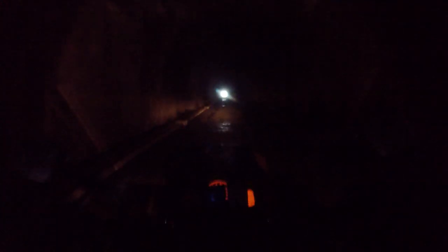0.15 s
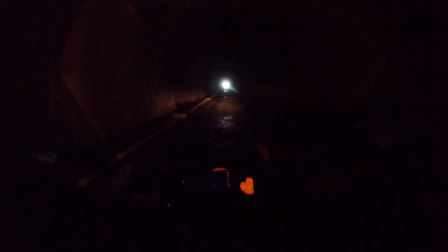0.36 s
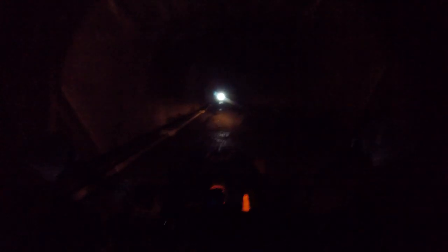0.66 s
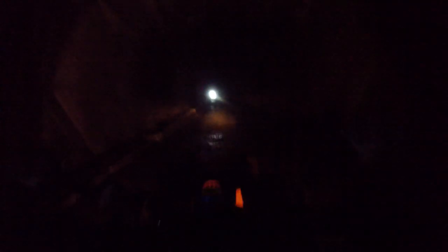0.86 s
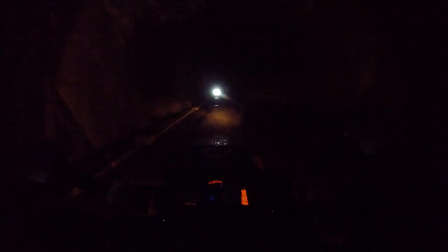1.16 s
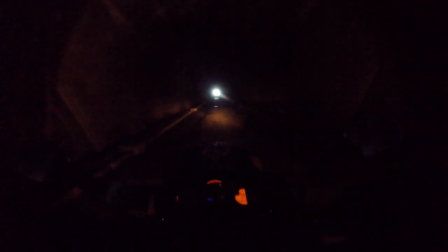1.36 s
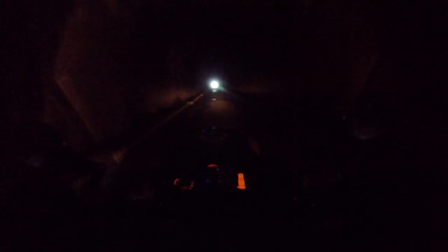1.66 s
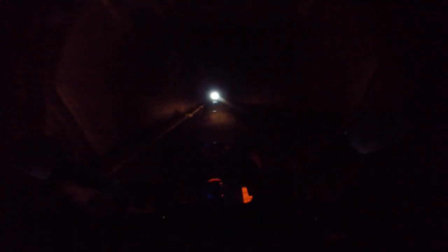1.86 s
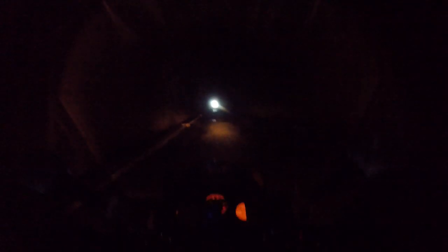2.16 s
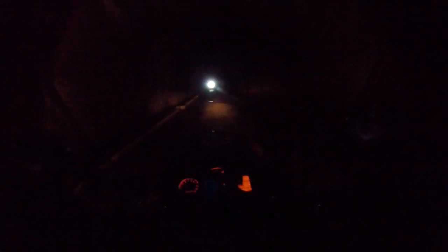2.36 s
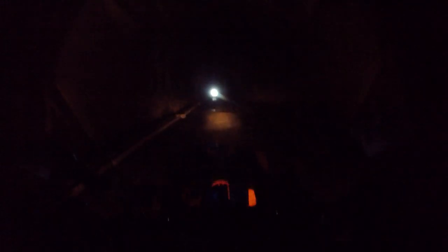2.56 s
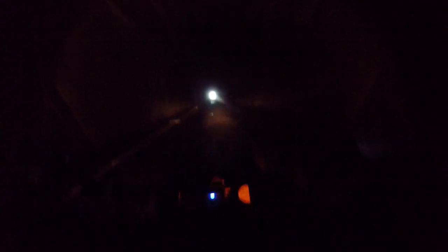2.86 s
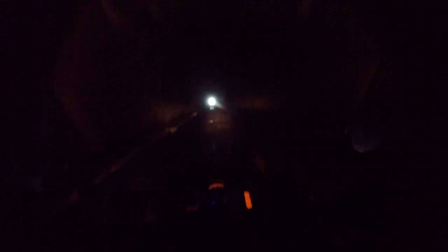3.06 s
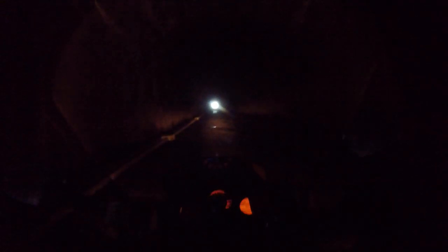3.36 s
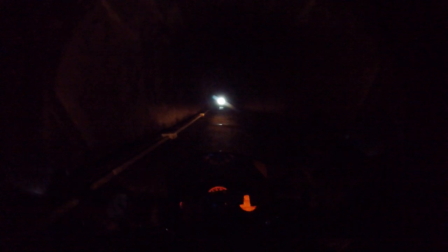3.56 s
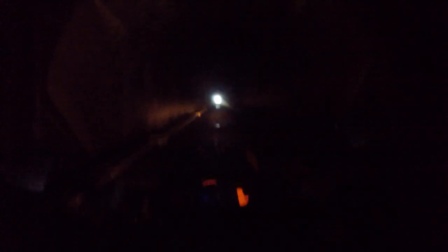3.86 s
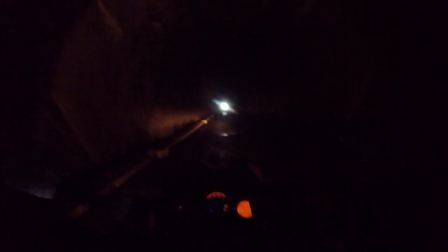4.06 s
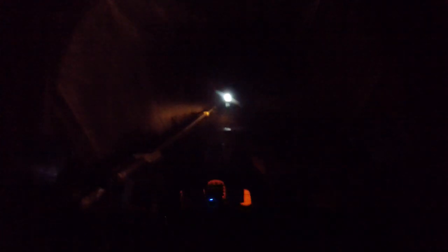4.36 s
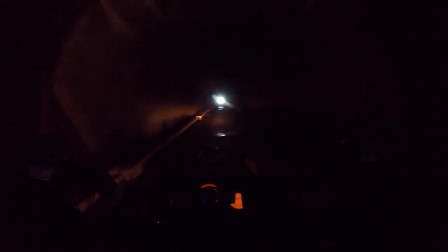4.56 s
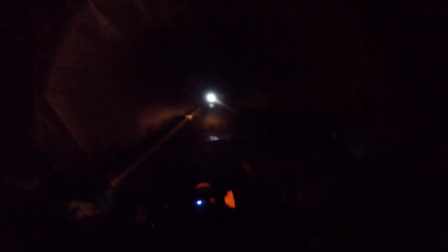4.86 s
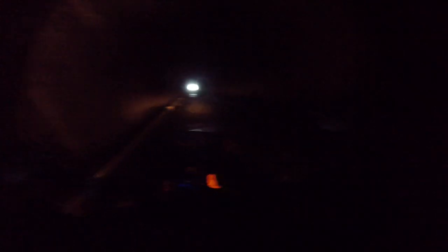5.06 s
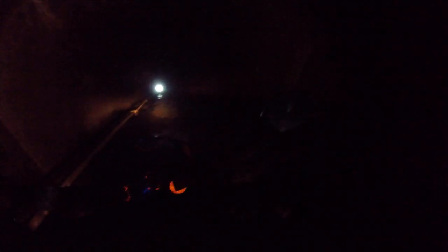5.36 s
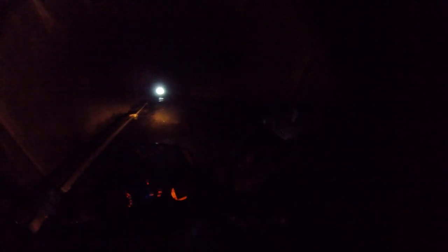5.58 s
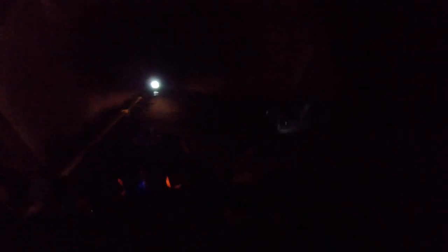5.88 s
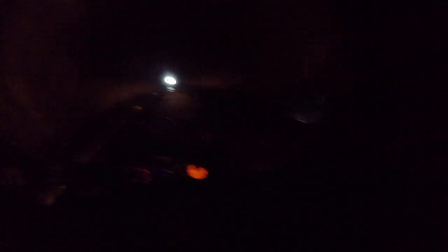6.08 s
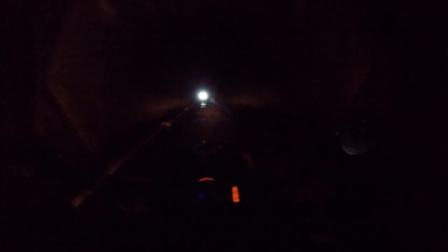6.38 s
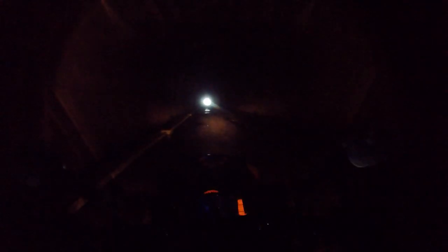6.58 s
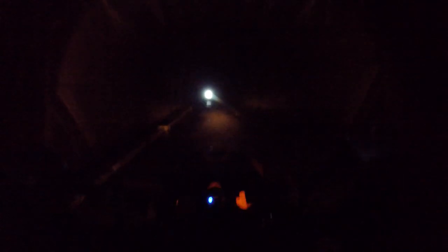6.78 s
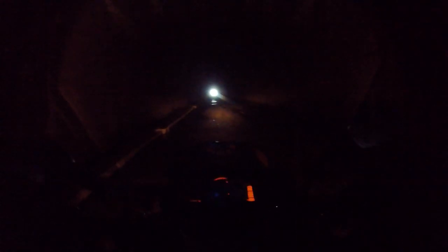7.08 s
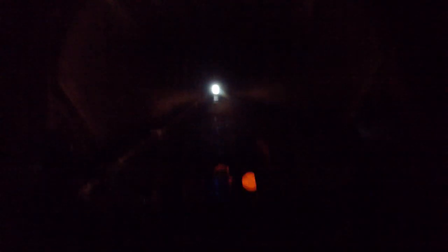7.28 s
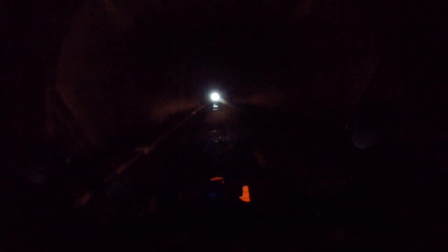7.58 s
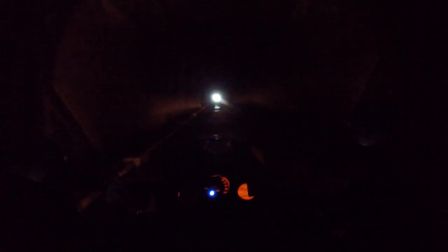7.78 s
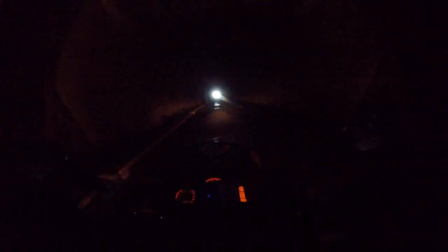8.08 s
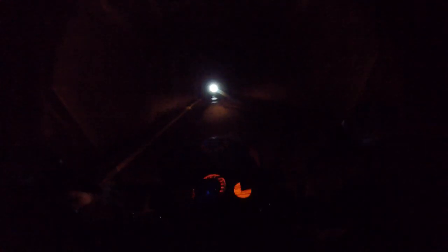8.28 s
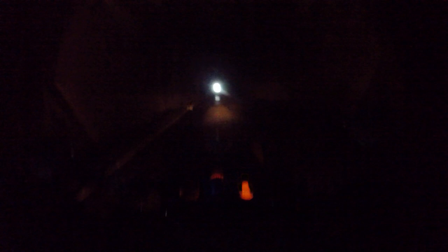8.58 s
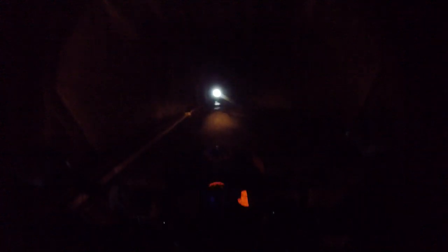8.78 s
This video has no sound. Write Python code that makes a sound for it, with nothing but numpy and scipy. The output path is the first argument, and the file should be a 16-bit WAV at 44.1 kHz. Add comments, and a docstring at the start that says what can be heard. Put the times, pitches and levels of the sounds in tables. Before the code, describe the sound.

Wind buffets a microphone on a moving motorbike inside a bare rock tunnel. Beneath the low rumble sit a smeared engine roar with a low boom swelling around the middle, a soft chain whine and a grainy wet-road hiss. Puddles splash briefly, loose plastic ticks a few times, and near the end a loud, buzzing horn sounds once, leaving a bright, slightly sharp echo.

```python
"""A motorbike rolls through a long, wet tunnel, heard from the rider's seat.
From the start, filtered noise and small eddies make the wind, stronger eddies thump the microphone,
noisy puffs make the engine's roar, blurred tones the chain's whine and grainy noise the tyres' wet hiss.
Puddles soon add short surges of spray; after three seconds, and again after seven, loose bodywork rattles.
Near 7.6 s the horn sounds once, a rasping stack of tones, and the tunnel echoes it, slightly sharp."""
import sys
import numpy as np
from scipy import signal
from scipy.fft import rfft, irfft, next_fast_len
from scipy.io import wavfile

SR = 44100
rng = np.random.default_rng(int(sys.argv[2]) if len(sys.argv) > 2 else 0)


def unload_wav(signal):
    """Save mono or channel-first audio to the path in sys.argv[1] as 16-bit WAV at rate SR, clipped to [-1, 1]."""
    wavfile.write(
        sys.argv[1],
        SR,
        np.round(np.clip(np.atleast_2d(signal).T, -1, 1) * 32767).astype(np.int16),
    )


N = 393813
TIME = np.arange(N) / SR  # seconds

# Wind strength along the ride, rising and falling several times: t/s, relative level/dB
WIND_STRENGTH = [(0, -30.5), (.7, -29.5), (1.6, -32.5), (2.15, -29.5), (2.9, -34.5), (3.9, -31.5),
                 (4.3, -33.5), (5.2, -33), (5.9, -33), (7.9, -33), (8.4, -35.5), (8.93, -34)]
# Tone colour of the wind noise: f/Hz, relative level/dB
WIND_COLOUR = [(8, -26), (18, -2.5), (30, 0.5), (50, -1.5), (85, -1), (120, -3.5), (170, -15), (300, -24.5),
               (700, -28.5), (2000, -68)]
# Eddies, mostly large and a few small and quick, that thump the microphone:
# t/s, relative level/dB, f/Hz (centre)
BUFFETS = [(0.011, -13.5, 152), (0.03, -17.5, 123), (0.053, -20, 176), (0.169, -17.5, 178),
           (0.389, -30, 111), (0.505, -13.5, 70.4), (0.62, -16, 92), (0.639, -16.5, 111), (0.696, -12, 297),
           (0.7, -6, 95.5), (0.718, -18, 120), (0.767, -16, 70), (0.838, -14.5, 153), (1.038, -20.5, 198),
           (1.082, -15.5, 110), (1.12, -12.5, 110), (1.202, -20, 82), (1.454, -22, 90.5), (1.68, -21, 88),
           (1.928, -17.5, 105), (1.955, -15.5, 100), (1.995, -17.5, 110), (2.015, -19, 123),
           (2.043, -20, 111), (2.163, -15, 74.1), (2.249, -24, 314), (2.359, -30, 199), (2.621, -18.5, 150),
           (2.812, -19.5, 394), (2.817, -13.5, 76), (2.995, -18, 99.7), (3.078, -18, 155), (3.114, -16, 92),
           (3.155, -11.5, 111), (3.164, -14.5, 89), (3.648, -21.5, 159), (3.913, -14.5, 170),
           (3.937, -18, 103), (4.237, -16.5, 153), (4.659, -14.5, 165), (4.697, -10.5, 103),
           (4.801, -20.5, 120), (4.969, -21, 114), (5.06, -20.5, 90), (5.147, -16.5, 95), (5.295, -17, 170),
           (5.473, -17.5, 131.4), (5.493, -17, 105), (5.537, -15, 98), (5.546, -18, 187), (5.602, -20, 85),
           (5.614, -21.5, 157), (5.702, -18, 138), (5.989, -16.5, 87), (6.092, -22, 125),
           (6.123, -17.5, 98.5), (6.241, -14.5, 88), (6.36, -17, 116), (6.484, -13.5, 70),
           (6.665, -21, 176), (6.672, -20, 708), (6.672, -10, 204), (6.681, -15.5, 430), (6.701, -16, 80),
           (6.771, -19, 75), (6.908, -18.5, 108), (6.981, -15.5, 83), (7.085, -12.5, 96),
           (7.749, -19.5, 104), (7.767, -21, 198), (7.879, -17.5, 98), (7.973, -15.5, 120),
           (7.981, -16, 131), (8.012, -18.5, 72), (8.085, -19.5, 89), (8.467, -21, 105),
           (8.637, -15.5, 120), (8.776, -17, 80), (8.793, -16.5, 100)]
# The engine's roar swells and sinks along the tunnel: t/s, relative level/dB
ROAR_LEVEL = [(0, -49), (2.6, -49), (3.45, -48), (4.8, -48.5), (6.1, -49.5), (7.3, -48.5), (8.93, -48.5)]
# Tone colour of the engine's roar: f/Hz, relative level/dB
ROAR_COLOUR = [(60, 9.5), (120, 6.5), (300, 2.5), (480, 1.5), (570, -2), (690, -.5), (820, -6.5),
               (1080, -6), (1650, -12), (1950, -11.5), (2600, -14.5), (3300, -20), (4300, -31.5),
               (7000, -50)]
# The drive chain meshing with its sprocket: t/s, f/Hz (teeth per second), relative level/dB
CHAIN = [(0, 350, -51.5), (1.2, 360, -52), (1.7, 370, -48.5), (2.4, 365, -55.5), (3.2, 330, -47.5),
         (4.3, 330, -59), (6, 320, -58), (7.1, 385, -56), (8.93, 292, -53)]
# Strength of the second, third and fourth multiples of the tooth rate: relative level/dB
CHAIN_PARTIALS = [-1, -8, -12.5]
# The tyres hiss louder where the road is wetter: t/s, level/dB
WET_ROAD = [(0, -50), (.6, -45), (1.35, -48.5), (1.9, -46.5), (2.7, -49), (3.5, -45.5), (4.6, -47),
            (5.6, -49.5), (7.2, -49), (8.93, -47.5)]
# Tone colour of the tyre spray: f/Hz, relative level/dB
HISS_COLOUR = [(2500, -11.5), (4300, -20.5), (5000, -14.5), (5800, -4), (6200, -2.5), (6480, 1),
               (6900, -7.5), (7600, -13), (9000, -18), (10200, -27.5), (12500, -37.5), (14000, -62)]
# Puddles that the tyres cut through: t/s, level/dB, time to fall to 1/e on either side/s, tilt/dB per octave
PUDDLES = [(.43, -51, 0.037, 14), (.65, -49.5, .05, 3), (.77, -49, 0.037, 6), (.975, -45.5, 0.053, 3),
           (1.557, -48, 0.034, -2), (1.811, -47, 0.059, -4), (3.261, -46, 0.014, -1),
           (4.735, -50, 0.026, 9)]
# Loose bodywork rattling over rough road: t/s, relative level/dB, f/Hz (centre)
RATTLES = [(3.062, -37.5, 1300), (3.232, -39, 2640), (3.394, -42, 980), (7.138, -35.5, 1250),
           (7.169, -40, 1290), (7.407, -35, 1380), (7.435, -40, 1210), (7.784, -31, 1100),
           (7.808, -35.5, 1000), (7.831, -29, 1250), (7.862, -36, 1030), (7.878, -37, 1170),
           (7.914, -39, 1010), (7.928, -33, 1020)]
# Tones that make up the horn's note: multiple of the pitch, relative level/dB
HORN_PARTIALS = [(1, 1.5), (2, -15), (3, -21.5), (4, -27), (5, -23), (6, -18), (7, -3.5), (8, -6.5), (9, 0),
                 (10, -8.5), (11, -18.5), (12, -23.5), (13, -28), (14, -25), (15, -26), (16, -21.5),
                 (17, -18), (18, -12), (19, -16), (20, -10.5), (21, -11), (22, -17.5), (23, -14.5),
                 (24, -16), (25, -18), (26, -17.5), (27, -26), (28, -23), (29, -32), (30, -29), (31, -23.5),
                 (32, -31), (33, -28), (34, -30), (35, -42), (36, -44)]
# Tone colour of the horn's rough clatter between those tones: f/Hz, relative level/dB
HORN_RASP = [(1500, -10), (2100, -31), (2600, 0), (3150, 6), (3450, 1), (3900, -36), (5000, -25),
             (6000, 2.5), (6700, -8), (8000, -22), (11500, -33), (13000, -54)]
# Free ringing of the horn's metal as the current comes on and goes off:
# t/s, f/Hz, level/dB, time to fall by 60 dB/s
HORN_RINGS = [(7.589, 292, -19, 0.047), (7.596, 3200, -22.5, 0.1), (7.703, 288, -20.5, 0.21)]
# Tone colour of what the horn beams down the tunnel: f/Hz, relative level/dB
BEAM = [(330, -15.5), (1000, -5), (1900, -3.5), (2300, -13.5), (2620, 1.5), (2960, 0), (3300, 3),
        (3900, -7.5), (4700, -2), (6200, 10.5), (8000, 0), (11500, 10)]
# How long the tunnel rings: f/Hz, time to fall by 60 dB/s
TUNNEL = [(250, 5.2), (1000, 1.6), (3100, 1.41), (6300, 0.83), (9000, 0.72), (12000, 0.19)]

FIRING_HZ = 23.25  # average engine firing rate
# The boom is strongest in one stretch, where the tunnel resonates
BOOM_DB, RESONANCE_DB, RESONANCE_AT_S, RESONANCE_WIDTH_S = -41.5, 13.5, 4.65, 0.22
CHAIN_BLUR_HZ = 42
# One press of the horn button; the level is that of its steady tone
HONK_AT_S, HONK_HOLD_S, HONK_DB = 7.594, 0.108, -17.5
HONK_ATTACK_S, HONK_RELEASE_DB_PER_S = 0.0092, 1700
HORN_HZ = 328.1
CLOSING = 0.016  # Doppler rise of an echo from straight ahead, as a share of the pitch
ECHO_SMEAR = 0.0048  # blur of an echo by the passing rough walls, as a share of the pitch
EDGE_HZ = 13900  # upper limit of the sound's treble


def gain_of(db):
    """Turns decibels into amplitude."""
    return 10 ** (np.asarray(db) / 20)


def evened(x):
    """Scales a sound to an average (rms) level of 1."""
    return x / np.sqrt(np.mean(x ** 2) + 1e-20)


def read(points, hz):
    """Reads a curve at hz, on a log-frequency axis."""
    f, value = np.transpose(points)
    return np.interp(np.log(hz + 1), np.log(f + 1), value)


def follow(rows, t=TIME):
    """Reads each column of a timed table at the times t."""
    s, *columns = np.transpose(rows)
    return [np.interp(t, s, column) for column in columns]


def coloured(x, points):
    """Filters a sound so that each frequency gets its own loudness."""
    size = next_fast_len(len(x) + 4096)
    gain = gain_of(read(points, np.fft.rfftfreq(size, 1 / SR)))
    return irfft(rfft(x, size) * gain, size)[:len(x)]


def wander(rate_hz, size=N):
    """Makes a smooth random curve of rms about 1, with little movement faster than rate_hz."""
    length = next_fast_len(size)
    spectrum = rfft(rng.standard_normal(length))
    spectrum[0] = 0  # no constant offset
    slowing = 1 + (np.fft.rfftfreq(length, 1 / SR) / rate_hz) ** 4
    return evened(irfft(spectrum / slowing, length))[:size]


def add(mix, s, sound):
    """Mixes a sound in from time s, cutting whatever falls outside the mix."""
    start = round(s * SR)
    sound = sound[max(-start, 0):]
    part = mix[max(start, 0):][:len(sound)]
    part += sound[:len(part)]


def eddy(hz, turn):
    """The pressure swing of one passing vortex, centred in 80 ms; turn sets push, pull or both."""
    t = np.arange(-0.04, 0.04, 1 / SR)
    swing = np.exp(2j * np.pi * turn) / (1 - 2.7j * hz * t) ** 3
    return swing.real * signal.windows.hann(len(t))


def wind(rumble_db=0.97, lumpy_db=5.0, lump_hz=13, eddies_per_s=44, eddy_db=1, spread_db=3.0):
    """Low turbulence and a patter of small eddies, both arriving in lumps."""
    strength = gain_of(follow(WIND_STRENGTH)[0])
    lumps = gain_of(lumpy_db * np.clip(wander(lump_hz), -3, 1))  # lulls are deeper than swells are high
    rumble = coloured(rng.standard_normal(N), WIND_COLOUR)
    out = gain_of(rumble_db) * evened(rumble * lumps)
    for hz in np.geomspace(85, 420, num=6):
        hits = rng.random(N) < eddies_per_s / 6 / SR  # random moments, shared among six eddy sizes
        extra_db = spread_db * np.minimum(rng.exponential(1, N), 3)
        size = lumps * gain_of(eddy_db + extra_db)
        size *= rng.choice([-1, 1], N)
        size *= (85 / hz) ** 0.64  # small vortices are quicker and weaker
        out += signal.oaconvolve(hits * size, eddy(hz, rng.random()), "same")
    return strength * out


def buffets(buffet_db=-0.5, gust_db=-17.5, gust_s=0.015, turn_spread=0.23,
            ring_hz=118, ring_q=3.2, ring_db=-6):
    """Each vortex thumps the microphone, mostly a push, inside a weak gust, with a brief low ring."""
    thumps, gust_power = np.zeros(N), np.zeros(N)
    t = np.arange(-SR // 8, SR // 8) / SR
    turns = turn_spread * rng.standard_normal(len(BUFFETS))
    for (s, db, hz), turn in zip(BUFFETS, turns):
        swing = gain_of(db + buffet_db) * eddy(hz, turn)
        add(thumps, s - len(swing) / 2 / SR, swing)
        power = gain_of(db + gust_db) ** 2 * np.exp(-(t / gust_s) ** 2)
        add(gust_power, s + t[0], power)  # overlapping gusts add as powers
    b, a = signal.iirpeak(ring_hz, ring_q, fs=SR)
    ring = gain_of(ring_db) * signal.lfilter(b, a, thumps)
    gust_noise = evened(coloured(rng.standard_normal(N), WIND_COLOUR))
    return thumps + ring + np.sqrt(gust_power) * gust_noise


def engine(roar_db=9.5, firing_share=0.22, puff_turns=1.0, flutter_db=0.5, waver_db=2.7):
    """Each firing puffs exhaust; the tunnel smears the puffs into a roar and booms at twice that rate."""
    firings = np.cumsum(FIRING_HZ * (1 + 0.007 * wander(3.1))) / SR  # running count
    puffs = evened(np.exp(-(firings % 1) / puff_turns) * rng.standard_normal(N))
    smeared = rng.standard_normal(N)
    roar = evened(coloured(firing_share * puffs + (1 - firing_share) * smeared, ROAR_COLOUR))
    level_db, = follow(ROAR_LEVEL)
    roar *= gain_of(level_db + roar_db + flutter_db * wander(37))
    resonance = 1 / np.hypot(1, (TIME - RESONANCE_AT_S) / RESONANCE_WIDTH_S)
    boom_level = gain_of(BOOM_DB + RESONANCE_DB * resonance + waver_db * wander(3.0))
    boom = np.sqrt(2) * np.sin(4 * np.pi * firings) * boom_level
    return roar + boom


def chain(slack=0.0121):
    """The chain whines on multiples of its tooth rate, wavering with slack and blurred by the tunnel."""
    tooth_hz, level_db = follow(CHAIN)
    teeth = np.cumsum(tooth_hz * (1 + slack * wander(4.065))) / SR  # running count
    whine = np.zeros(N)
    for multiple, db in enumerate(CHAIN_PARTIALS, 2):
        blur = wander(CHAIN_BLUR_HZ) + 1j * wander(CHAIN_BLUR_HZ)  # random level and phase
        whine += gain_of(db) * (blur * np.exp(2j * np.pi * multiple * teeth)).real
    return gain_of(level_db) * whine


def tyres(surge_db=0.65, surge_hz=14, drop_db=1.5):
    """Fine spray from the wet road: noise made grainy, as by countless droplets of uneven size."""
    wet_db, = follow(WET_ROAD)
    spray = rng.standard_normal(N) * gain_of(drop_db * wander(2200))
    return evened(coloured(spray, HISS_COLOUR)) * gain_of(wet_db + surge_db * wander(surge_hz))


def puddles():
    """Each puddle throws up a short surge of spray, brighter or duller than the road's hiss."""
    out, t = np.zeros(N), np.arange(-SR // 6, SR // 6) / SR
    for s, db, fall_s, tilt in PUDDLES:
        colour = [(hz, level + tilt * np.log2(hz)) for hz, level in HISS_COLOUR]
        spray = evened(coloured(rng.standard_normal(len(t)), colour))
        add(out, s + t[0], gain_of(db) * np.exp(-(t / fall_s) ** 2) * spray)
    return out


def rattles(knock_t60=0.031, chatter_db=-11, chatter_t60=0.34, grain_db=5, grains_hz=700, panel_octaves=0.5):
    """A plastic panel gives one dry knock around a dull, broad resonance, then a fine, fading chatter."""
    out, t = np.zeros(N), np.arange(SR // 5) / SR
    knock, chatter = gain_of(-60 * t / knock_t60), gain_of(chatter_db - 60 * t / chatter_t60)
    level = np.hypot(knock, chatter)
    for s, db, hz in RATTLES:
        grain_level = gain_of(grain_db * np.clip(wander(grains_hz, size=len(t)), -2, 1.5))
        grains = evened(rng.standard_normal(len(t)) * grain_level)
        half_band = 2 ** (panel_octaves / 2)
        panel = signal.butter(1, [hz / half_band, hz * half_band], "bandpass", fs=SR, output="sos")
        damping = signal.butter(3, 1.24 * hz, fs=SR, output="sos")  # dulls the treble
        sound = signal.sosfilt(np.vstack([panel, damping]), grains * level)
        add(out, s, gain_of(db) * np.sqrt(SR / hz) * sound)  # lower pitches pass a narrower band
    return out


def diaphragm(doppler, smear, rasp_db=-17, start_rasp_db=7, settle_s=0.029):
    """The horn's armature strikes its pole each cycle and rings the tone disc, raspiest at the start."""
    t = np.arange(SR // 6) / SR
    release_db = HONK_RELEASE_DB_PER_S * np.maximum(t - HONK_HOLD_S, 0)
    level = np.minimum(t / HONK_ATTACK_S, 1) * gain_of(HONK_DB - release_db)
    # the pitch jitters and starts a little flat
    jitter = 0.003 * wander(200, size=len(t)) + smear * wander(80, size=len(t))
    bend = jitter - 0.045 * np.exp(-t / 0.009)
    cycles = np.cumsum(doppler * HORN_HZ * (1 + bend)) / SR
    tone = np.zeros(len(t))
    for multiple, db in HORN_PARTIALS:
        tone += gain_of(db) * np.cos(2 * np.pi * (multiple * cycles + rng.random()))
    strikes = rng.standard_normal(len(t)) * np.exp(-2 * (cycles % 1))
    rasp = evened(coloured(strikes, HORN_RASP))
    rasp_level = gain_of(rasp_db + start_rasp_db * np.exp(-(t / settle_s) ** 2))
    return level * (evened(tone) + rasp_level * rasp)


def tunnel(x, delay, axial_db=-13, axial_lasts=1.93):
    """Dense reflections from bare rock; waves along the tunnel's axis linger longest."""
    hz, t, z = signal.stft(rng.standard_normal(2 * SR), SR, nperseg=256)
    fall_db = -60 * t / read(TUNNEL, hz)[:, None]
    fading = np.hypot(gain_of(fall_db), gain_of(axial_db + fall_db / axial_lasts))
    tail = signal.istft(z * fading, SR, nperseg=256)[1]
    # silent until the delay (in seconds), full at twice the delay
    tail *= np.clip(np.arange(len(tail)) / SR / delay - 1, 0, 1)
    return signal.oaconvolve(x, tail / np.sqrt(SR / 10))[:N]


def horn(echo_db=2, wall_s=0.0045, far_s=0.0052, rear_db=22):
    """The direct honk and its echoes: sharp from ahead, flat from behind, where little treble is sent."""
    out, t = np.zeros(N), np.arange(SR // 4) / SR
    add(out, HONK_AT_S, diaphragm(1, smear=0))
    for s, hz, db, t60 in HORN_RINGS:
        add(out, s, gain_of(db - 60 * t / t60) * np.sin(2 * np.pi * hz * t))
    for ahead in np.linspace(-1, 1, num=9):  # from straight behind to straight ahead
        shade_db = rear_db * ((1 - ahead) / 2) ** 2
        colour = [(hz, db - shade_db * np.sqrt(hz / 3000)) for hz, db in BEAM]
        beam = coloured(diaphragm(1 + CLOSING * ahead, ECHO_SMEAR), colour)
        echo = tunnel(beam, wall_s + far_s * abs(ahead))
        add(out, HONK_AT_S, gain_of(echo_db) / np.sqrt(9) * echo)  # shared among nine directions
    return out


def scene():
    """Everything at the one microphone."""
    ride = wind() + buffets() + engine() + chain() + tyres()
    return (ride + puddles() + rattles() + horn())[None]


def record(dry):
    """Weakens the deepest pressure swings and leaves out the highest treble."""
    highpass = signal.butter(2, 14, "highpass", fs=SR, output="sos")
    thinned = signal.sosfilt(highpass, dry)
    lowpass = signal.firwin(511, EDGE_HZ, window=("kaiser", 9), fs=SR)
    return signal.oaconvolve(thinned, lowpass[None], "same")


dry = scene()
out = record(dry)
unload_wav(out)
```